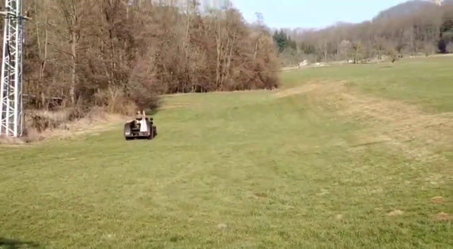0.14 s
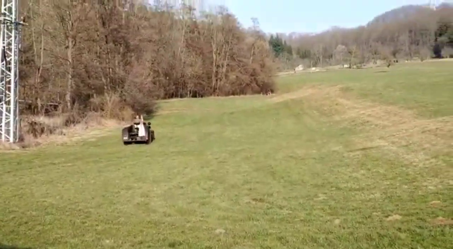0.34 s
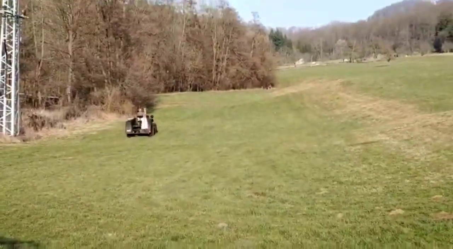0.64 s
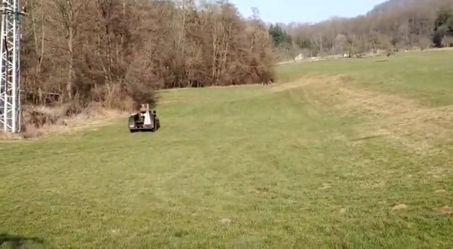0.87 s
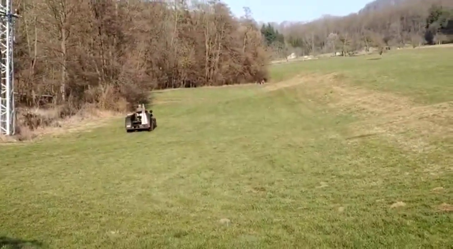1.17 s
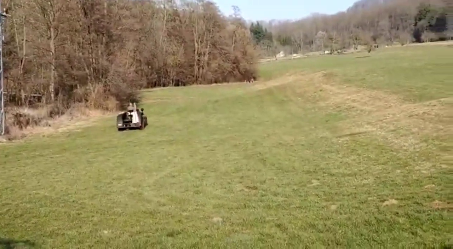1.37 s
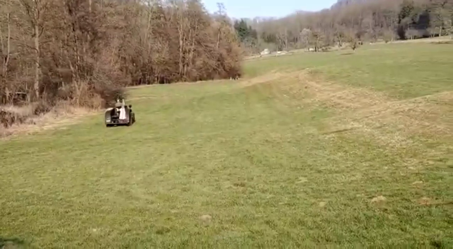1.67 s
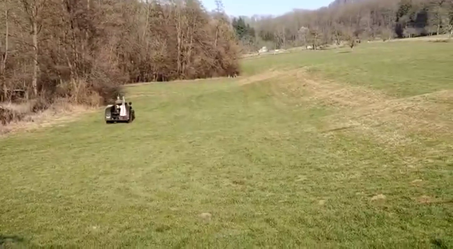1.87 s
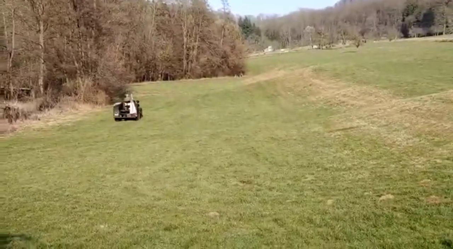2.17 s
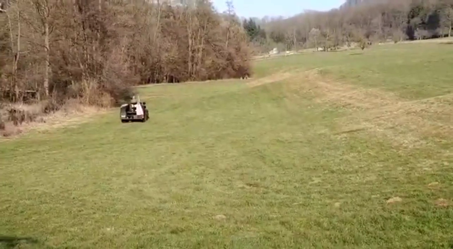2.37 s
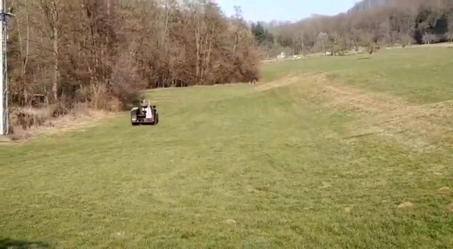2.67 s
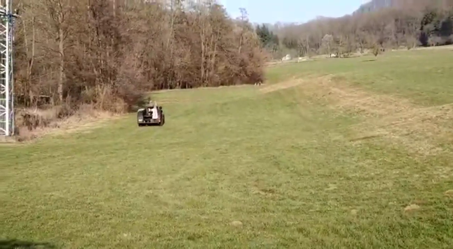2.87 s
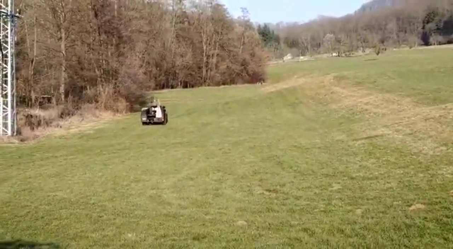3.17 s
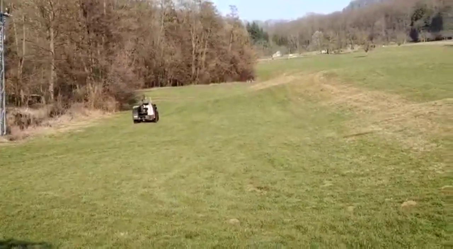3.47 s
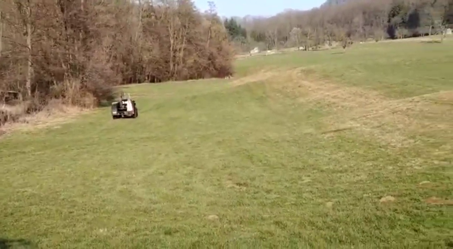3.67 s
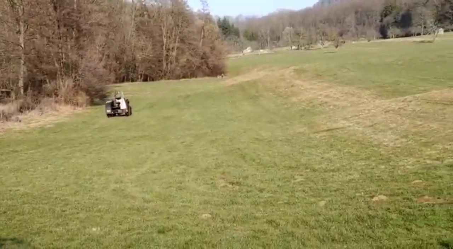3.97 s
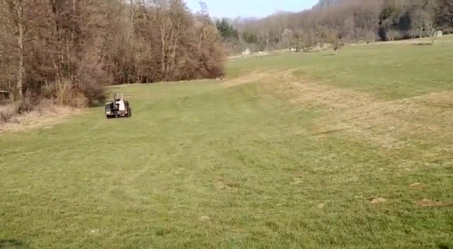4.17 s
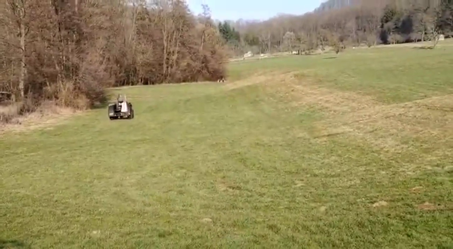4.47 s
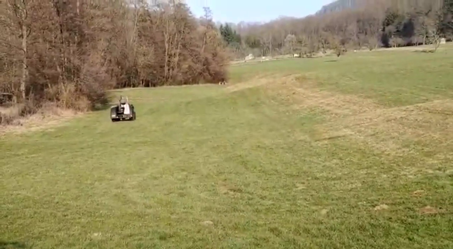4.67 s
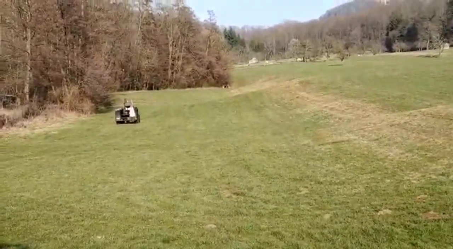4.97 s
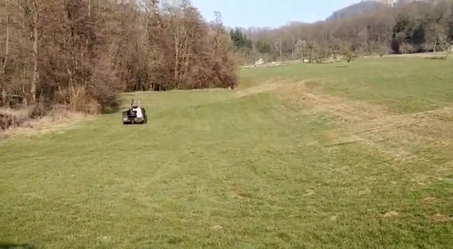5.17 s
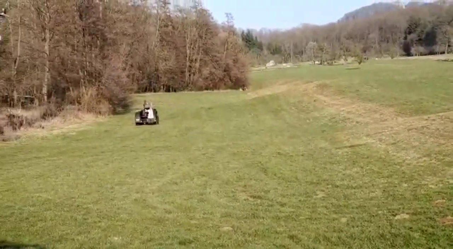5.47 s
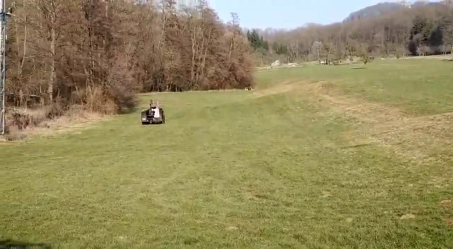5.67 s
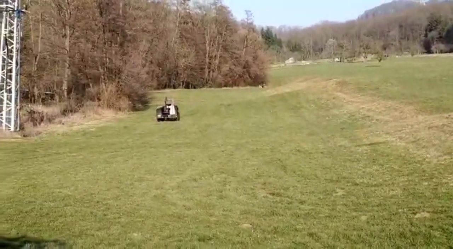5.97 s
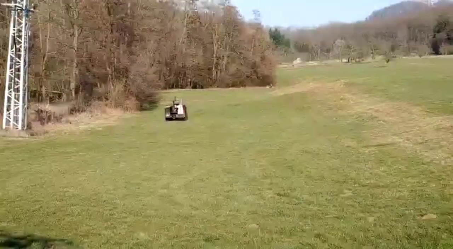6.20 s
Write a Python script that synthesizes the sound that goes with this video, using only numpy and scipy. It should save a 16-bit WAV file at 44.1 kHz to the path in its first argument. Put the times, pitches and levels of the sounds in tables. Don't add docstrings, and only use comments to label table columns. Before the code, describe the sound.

Rapid, even chugging from a one-cylinder engine: round bass thump, hollow intake ring, hoarse exhaust puff, rattling tin. It gradually eases and dulls with distance, falters for two weak beats, then barks again. Dry leaves rustle in faint gusts, twigs tick, and one tiny bird peep follows the stumble. Open field beside trees, distant handheld phone pickup.

```python
import sys
import numpy as np
from scipy import signal
from scipy.fft import rfft, irfft
from scipy.io import wavfile
from scipy.ndimage import uniform_filter1d

SR = 44100
rng = np.random.default_rng(int(sys.argv[2]) if len(sys.argv) > 2 else 0)


def wav_record(signal):
    frames = np.transpose(np.atleast_2d(signal))
    bounded = np.clip(frames, -1, 1)
    quanta = np.round(bounded * 32767).astype(np.int16)
    wavfile.write(sys.argv[1], SR, quanta)


def voltage_ratio(level):
    return 10 ** (np.asarray(level, float) / 20)


N = 279594

# f/Hz, width/Hz, level/dB
SHELL = [(3180, 140, 1), (4380, 200, -3), (5190, 200, -1), (5890, 200, -3), (6540, 200, -5),
         (10000, 900, -10)]
# t/s, time between firings/ms
GOVERNOR = [(0, 136.7), (.5, 138.1), (1, 139.2), (1.25, 141.4), (1.55, 141.4), (1.85, 146.5), (2.4, 149.9),
            (2.7, 148.8), (2.9, 153), (3.5, 153.6), (4.1, 150.6), (4.45, 146.7), (4.85, 157.8), (5.2, 154),
            (5.8, 154.2), (6.1, 152)]
RECEDES_S = 3.


def level(x, db):
    return x * voltage_ratio(db) / np.sqrt(np.mean(x ** 2))


def colour(x, shape):
    hz, db = np.transpose(shape)
    log_f = np.log(np.fft.rfftfreq(N, 1 / SR) + 1)
    gain = voltage_ratio(np.interp(log_f, np.log(hz), db, -90, -90))
    return level(irfft(rfft(x) * gain, N), 0)


def walk(rate):
    k = int(SR / rate)
    held = np.repeat(rng.standard_normal(N // k + 1), k)
    return 0.66 * uniform_filter1d(uniform_filter1d(held, k), k)[:N]


def add(out, s, piece):
    i = int(s * SR)
    a, b = np.clip([i, i + len(piece)], 0, N)
    out[a:b] += piece[a - i:b - i]


def drive(s):
    # t/s, shaking/dB, clear path/dB, intake draught/dB
    ground = [(0, 0.5, -1.5, 1.2), (0.551, -0.7, 3.5, 2), (1.2, -0.9, -1, 0.3), (1.85, -3.5, -2, -2.5),
              (2.3, -1.6, -0.5, -4.5), (2.749, -2.5, -0.4, -3.5), (3.3, -2.5, -2.5, -4.5),
              (3.649, -5.5, -6, -3), (4.4, -5, -11.5, -5.5), (4.93, -15, -13.5, -5.5),
              (5.03, -7.5, -11, -7), (5.2, -3.5, -2.5, -5.5), (5.6, -3.5, -4.1, -5),
              (6.1, -3.5, -3.5, -6.5), (6.34, 1.5, -3.5, -7)]
    at, *curves = np.transpose(ground)
    return [np.interp(s, at, c) for c in curves]


def firings():
    # t/s, thump lost/dB, gas lost/dB
    misses = [
        (4.545, 1.9, 5.5),
        (4.694, 6, 21),
        (4.848, 8.4, 20),
        (5.005, 2.6, 5.8),
    ]
    # t/s, bark gain/dB, rasp gain/dB, crack gain/dB
    odd_ones = [(.02, 2.5, -1, 2.9), (.16, 0.5, 4, 0.5), (.44, 1.5, 0.4, 5.5), (.71, -0.2, 0.6, 4),
                (1.13, -1, 0.3, 2), (1.41, -3.5, -0.6, 0.3), (1.69, -2.5, 0.6, -1.2),
                (1.84, -3.5, -0.5, 1.3), (2.13, 1, 1.1, 0), (2.28, 1.6, 2, -0.2), (2.43, -0.5, 2, 0.8),
                (2.58, 1.5, 3.5, -0.2), (2.72, -0.6, 2.5, 0), (2.88, -3, 1.5, 1.3), (3.03, -2.1, 0, 1.7),
                (3.18, 0.4, -0.3, 2.5), (3.33, -4.5, 0.4, .1), (3.49, -1.1, -3, 0.1),
                (3.64, -4.5, 0.7, -1.1), (3.95, -0.3, -2.1, 1), (4.1, -2, 0.2, -0.2), (4.25, 0.1, -4, 1.5),
                (5.32, -0.3, -3, -2.3), (5.78, .1, 3, 0.2), (5.93, 1.8, 2.5, 1.9), (6.24, 5, 2.3, -1)]
    first_s = .0238
    times = [first_s - .136, first_s]
    while times[-1] < N / SR - .16:
        times.append(times[-1] + np.interp(times[-1], *np.transpose(GOVERNOR)) / 1000)
    s = np.array(times)

    def nearest(at):
        return np.abs(s - at).argmin()

    s[nearest(2.726)] -= .0092
    lost, odd = np.zeros((2, len(s))), np.zeros((3, len(s)))
    for at, *db in misses:
        lost[:, nearest(at)] = db
    for at, *db in odd_ones:
        odd[:, nearest(at)] = db

    far = np.maximum(s - RECEDES_S, 0)
    _, clear_db, draught_db = drive(s)
    thump_db = -10 - .65 * far - lost[0]
    intake_db = -22.7 + draught_db - 0.59 * lost[0]
    gas_db = np.array([-25.5 - 2 * far, -32 - 2 * far, -52 + clear_db])
    gas_db = gas_db + odd - lost[1] + 0.6 * rng.standard_normal((len(s), 3)).T
    return np.array([s, thump_db, intake_db, *gas_db]).T


def ring(delay_ms, start_hz, end_hz, glide_ms, swell_ms):
    u = np.maximum(np.arange(SR // 4) / SR * 1000 - delay_ms, 0)
    glide = (start_hz - end_hz) * glide_ms * (1 - np.exp(-u / glide_ms))
    turns = (end_hz * u + glide) / 1000
    swell = (u / swell_ms) ** 2 * np.exp(2 - 2 * u / swell_ms)
    return swell * np.sin(2 * np.pi * turns)


def thump(thump_db, weak):
    # delay/ms, start f/Hz, end f/Hz, glide/ms, swell/ms, size
    blowdown = [
        (0, 146, 30, 14.5, 8.3, 1.04),
        (8.4, 137, 87, 11, 11.8, -.38),
    ]
    (*first, a), (*second, b) = blowdown
    waves = a * (1 - .3 * weak) * ring(*first) + b * (1 + weak) * ring(*second)
    return voltage_ratio(thump_db + .6) * waves


def add_intake(low, s, ring_db, slow, weak, chance):
    # delay/ms, start f/Hz, end f/Hz, glide/ms, swell/ms, size, turn-time power of delay, of pitch drop
    intake = [
        (27.2, 262, 139, 37.6, 18.5, 1., .3, -.35),
        (23.3, 268, 30, 31.7, 15.5, -.55, 0, 0),
        (48.7, 105, 77, 97, 16.2, .95, 1.24, -1),
        (65.7, 30, 131, 13, 10.1, -.95, .6, .24),
        (88.3, 178, 128, 75, 17.2, .22, 1.24, -.7),
    ]
    for (ms, hi, lo, glide, swell, size, drag, sag), (late, sharp, strong) in zip(intake, chance):
        tune = (1 + .008 * sharp) / slow ** sag
        size = size * (1 - .9 * weak * (hi > 150))
        delay = ms * slow ** drag + .25 * late
        add(low, s, size * voltage_ratio(ring_db + 1.2 * strong) * ring(delay, hi * tune, lo * tune, glide, swell))


def puff(rise_ms, hold_ms, fall_ms):
    u = np.arange(SR // 12) / SR * 1000
    rise = np.sin(np.pi / 2 * np.minimum(u / rise_ms, 1)) ** 2
    return rise * np.exp(-np.maximum(u - hold_ms, 0) / fall_ms)


def burst(noise, s, shape, db):
    i = max(int(s * SR), 0)
    piece = np.resize(noise[i:], len(shape)) * shape
    return piece * voltage_ratio(db) / np.sqrt(np.mean(piece[:int(.018 * SR)] ** 2))


def pipe(modes, lo_hz, hi_hz):
    white = rng.standard_normal(N + SR)
    y = 0
    for k, (hz, width, db) in enumerate(modes):
        y = y + (-1) ** k * voltage_ratio(db) * signal.lfilter(*signal.iirpeak(hz, hz / width, SR), white)
    return signal.sosfilt(signal.butter(4, [lo_hz, hi_hz], "band", fs=SR, output="sos"), y)[:N]


def gas_noises():
    # f/Hz, width/Hz, level/dB
    stack_low = [(576.7, 100, 1.5), (718, 98, 0), (832, 134, -2.5)]
    stack_high = [(1330, 180, -9.5), (1616, 252, 4), (2410, 230, -9), (3173, 130, -16.5)]
    # f/Hz, level/dB per Hz
    crack = [(2800, -34.5), (3600, 11.5), (5000, 0), (7300, -5.5), (10000, -4.5), (11500, -17),
             (12500, -28.5), (15700, -41)]
    ragged = voltage_ratio(2.4 * walk(250))
    bark = ragged * pipe(stack_low, 367, 1380)
    throat = ragged * pipe(stack_high[:2], 996, 2850)
    mouth = ragged * pipe(stack_high[2:], 2100, 3800)
    hiss = colour(rng.standard_normal(N), crack)
    modes = [level(pipe([mode], mode[0] / 1.15, mode[0] * 1.15), mode[2]) for mode in SHELL]
    steel = colour(rng.standard_normal(N), [(1800, -23.5), (2600, 5.5), (3600, 2.0), (6000, -17.5)])
    return bark, throat, mouth, hiss, np.array(modes), steel


def add_gas(gas, noises, s, levels_db, slow, shell_chance, steel_chance):
    bark, throat, mouth, hiss, shell, steel = noises
    bark_db, rasp_db, crack_db = levels_db
    plate = shell[0]
    start = max(int(s * SR), 0)
    at = slice(start, start + SR // 10)
    clang = hiss[at] + .4 * voltage_ratio(5.5 * shell_chance) @ shell[:, at]
    bright = voltage_ratio(.7 * (crack_db - rasp_db + 21))
    rasp = throat[at] + bright * mouth[at]
    opening = bark[at] + rasp + 0.027 * bright * plate[at]
    plate_db = crack_db + 1 + 2.5 * max(s - RECEDES_S, 0) + 1.9 * shell_chance[-1]

    add(gas, s - .007, burst(opening, 0.045, puff(2.7, 7.3, 2.1), bark_db - 24))
    add(gas, s - .003, burst(bark, s, puff(13, 14, 5.5), bark_db))
    add(gas, s - .002, burst(rasp, 0, puff(10, 13, 5.5), rasp_db))
    add(gas, s + .0016, burst(clang, 0, puff(1.6, 4, 3) + .5 * puff(2.5, 9, 7), crack_db + 1))
    add(gas, s - .006, burst(plate, s, puff(18, 15.2, 5.5), plate_db))
    add(gas, s - .038, burst(plate, s / 2, puff(4, 24, 13), crack_db - 18.5 + 4.4 * shell_chance[-2]))
    add(gas, s + .036 * slow, burst(steel, s, puff(12, 16, 15), crack_db - 12 + 3 * steel_chance))


def engine():
    low, gas = np.zeros((2, N))
    rows = firings()
    gaps_s = np.diff(rows[:, 0], append=rows[-1, 0] + .153)
    turns = signal.medfilt(gaps_s / .145 - 1, 5) + 1
    noises = gas_noises()
    for (s, thump_db, ring_db, *gas_db), slow in zip(rows, turns):
        weak = np.clip((-12 - thump_db) / 9, 0, .8)
        ring_chance = rng.standard_normal((5, 3))
        shell_chance = rng.standard_normal(len(SHELL))
        add(low, s, thump(thump_db, weak))
        add_intake(low, s, ring_db, slow, weak, ring_chance)
        add_gas(gas, noises, s, gas_db, slow, shell_chance, ring_chance[0, 2])
    return low, gas


def spread(shape, wide_db, grain_db=0.):
    mid, side = (colour(rng.standard_normal(N) * voltage_ratio(grain_db * walk(300)), shape) for _ in range(2))
    side = signal.sosfilt(signal.butter(2, 900, "high", fs=SR, output="sos"), side)
    return mid + voltage_ratio(wide_db) * side * np.array([[1], [-1]])


def wood(gas, t60=0.99, wet_db=-14):
    # f/Hz, level/dB per Hz
    wash = [(300, -27), (450, -7), (600, 8), (900, 0), (1500, -4), (2200, -8.5), (3000, -31), (4200, -33.5),
            (6500, -53.5)]
    t = np.arange(SR) / SR
    shape = (np.minimum(t / 0.0042, 1) * voltage_ratio(-60 * t / t60)) ** 2
    power = signal.fftconvolve(gas ** 2, shape / shape.sum())[:N]
    return voltage_ratio(wet_db) * np.sqrt(np.abs(power)) * spread(wash, -1.5, 0.73)


def bed():
    # t/s, gain/dB, half length/s
    gusts = [
        (0, 3.5, 0.095),
        (0.711, 7.5, .2),
        (1.664, 10, .18),
        (2.139, 6.5, 0.41),
        (5.35, 4, .15),
        (6.36, 9, .22),
    ]
    t = np.arange(N) / SR
    shake_db = drive(t)[0]
    gust_db = sum(db * np.maximum(1 - np.abs(t - s) / half, 0) for s, db, half in gusts)
    fast_ms = np.maximum(141.4 - np.interp(t, *np.transpose(GOVERNOR)), 0)
    gear_db = -46.5 + 0.34 * shake_db - np.maximum(t - RECEDES_S, 0)
    leaf_db = -72.5 + 1.5 * shake_db + gust_db
    rumble_db = -34 + 0.98 * fast_ms
    return gear_db, leaf_db, rumble_db, -66.5 + shake_db


def meadow():
    # f/Hz, level/dB per Hz
    gear_shape = [(250, -1), (400, 0.5), (600, 3.5), (900, 1.5), (1500, -8), (2200, -19), (2800, -30.5),
                  (4000, -33.5)]
    tin_shape = [(1800, -26.5), (2400, 1), (3300, -7.5), (4200, -14), (5200, -19.5), (6500, -29)]
    leaf_shape = [(3000, -19), (4500, -10), (6500, -1.5), (7500, -6), (10300, -3.5), (11600, -10),
                  (12300, -14.5), (15500, -22.5)]
    rumble_shape = [(20, -15.5), (45, 2.5), (100, 3.5), (150, -6.5), (210, 2), (260, -30.5), (320, -33.5)]
    gear_db, leaf_db, rumble_db, tin_db = bed()
    gear = voltage_ratio(gear_db + 1 + 1.2 * walk(20)) * spread(gear_shape, -1.2, 1.2)
    tin = voltage_ratio(tin_db + 2 + 2 * walk(12)) * spread(tin_shape, -1.2, .8)
    plate = voltage_ratio(tin_db - 7 + 5 * walk(18)) * level(pipe(SHELL[:1], 2900, 3500), 0)
    leaves = voltage_ratio(leaf_db - 3 + 3.7 * walk(36)) * spread(leaf_shape, -1.5, 2.3)
    rumble = voltage_ratio(rumble_db - 2.5 + 3.9 * walk(10)) * spread(rumble_shape, -2.0)
    return gear + tin + plate + leaves + rumble


def small_sounds():
    # t/s, peak level/dB
    twigs = [
        (1.2246, -50.5),
        (2.934, -59),
        (4.821, -67),
        (4.897, -50.5),
    ]
    # t/s, length/s, start f/Hz, end f/Hz, level/dB
    peep = (5.025, .06, 7000, 6500, -80)
    out = np.zeros(N)
    t = np.arange(200) / SR
    tones = np.sin(2 * np.pi * 10200 * t) + 0.86 * np.sin(2 * np.pi * 6400 * t)
    tick = np.minimum(t / .0003, 1) * np.exp(-t / 0.00055) * tones
    for s, db in twigs:
        add(out, s, voltage_ratio(db) * tick)
    s, length, start_hz, end_hz, db = peep
    u = np.arange(int(length * SR)) / SR
    turns = start_hz * u + (end_hz - start_hz) * u ** 2 / length / 2
    add(out, s, voltage_ratio(db) * np.sin(np.pi * u / length) * np.sin(2 * np.pi * turns))
    return out


def scene():
    low, gas = engine()
    f = np.minimum(np.fft.rfftfreq(N, 1 / SR), 2360)
    lead = np.exp(np.array([[1j], [-1j]]) * np.pi * f * .00009)
    ports = irfft(rfft(low + gas) * lead, N)
    return ports + wood(gas) + meadow() + small_sounds()


def band_limit(x):
    return signal.sosfilt(signal.butter(12, 15700, fs=SR, output="sos"), x)


def record(dry):
    x = dry * voltage_ratio(np.array([[-0.65], [0.65]]) / 2)
    f = np.fft.rfftfreq(N, 1 / SR)
    mid, side = rfft(x[0] + x[1]) / 2, rfft(x[0] - x[1]) / 2
    treble = f > 6440
    mid = mid + 0.37 * np.abs(side) * treble * mid / (np.abs(mid) + 1e-12)
    side = side * np.where(treble, .5, 1) * np.interp(f, [10500, 12000], [1, .3])
    dim_top = np.interp(f, [11300, 12300], [1, .3]) * (f < 15700)
    bass_cut = f / np.hypot(f, 8.5)
    x = irfft(np.array([mid + side, mid - side]) * dim_top * bass_cut, N)
    x = x + voltage_ratio(-101 + 3.5 * walk(12)) * rng.standard_normal(N)
    return band_limit(x)


dry = scene()
out = record(dry)
wav_record(out)
```